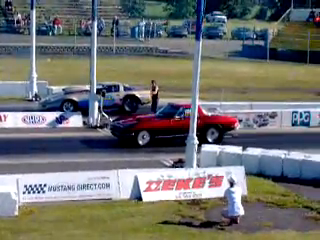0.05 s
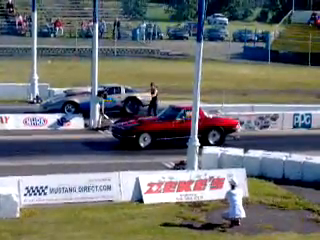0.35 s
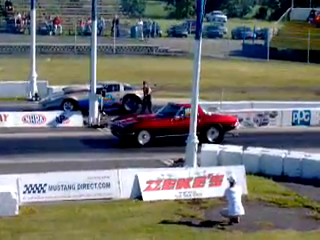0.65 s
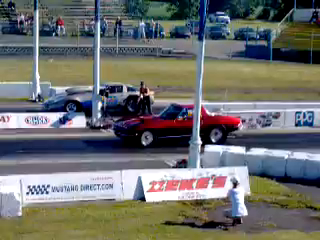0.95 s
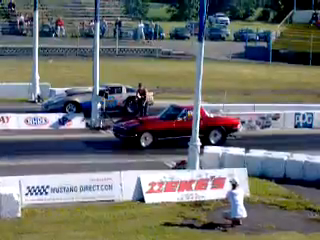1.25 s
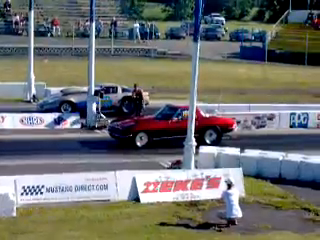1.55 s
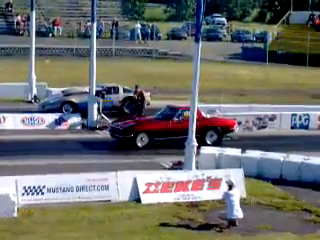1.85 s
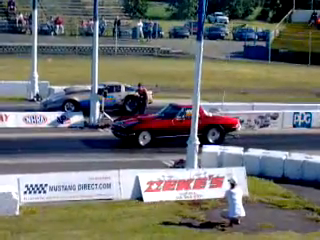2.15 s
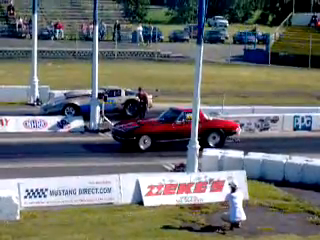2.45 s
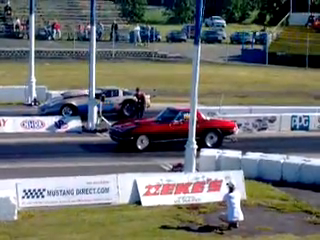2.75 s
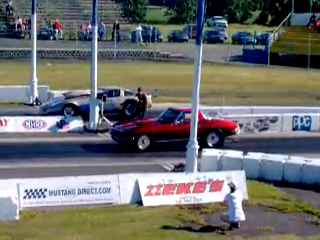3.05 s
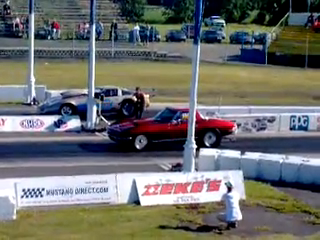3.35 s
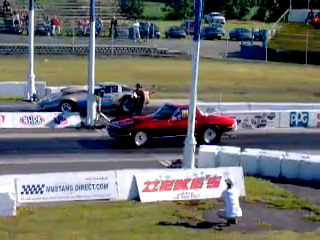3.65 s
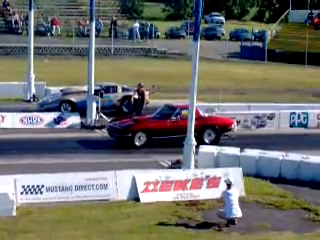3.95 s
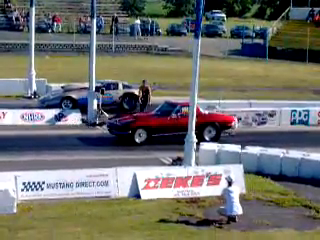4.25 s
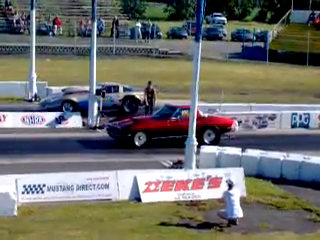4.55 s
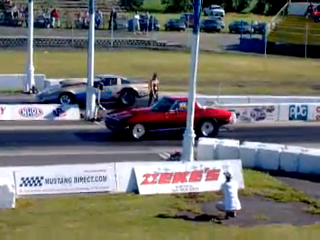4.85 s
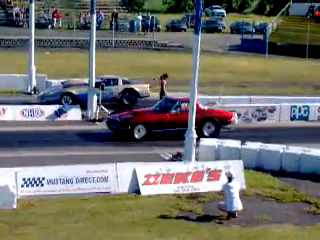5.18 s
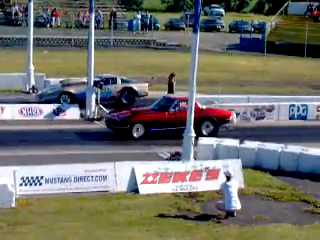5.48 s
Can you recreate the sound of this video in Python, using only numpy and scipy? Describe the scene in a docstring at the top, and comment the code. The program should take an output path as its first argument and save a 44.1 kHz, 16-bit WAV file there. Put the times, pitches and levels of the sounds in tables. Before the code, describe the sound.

A nearby V8 drag car opens at the top of a hard rev, blaring and rasping through open exhaust pipes. Its pitch slides down and its level falls over the first second, with a low pop at about 0.8 seconds. By 1.2 seconds it has settled into a loping idle: ragged, bassy firings with irregular thumps and brief lulls, topped by a gassy rattle, tinny cracks and short metallic rasps. Hollow exhaust pops come around 2.1, 2.5 and 2.9 seconds, with a sharper one near 5 seconds. The thumping is busiest between 2 and 3 seconds. Farther away, a second V8 hums at a fast, even idle, sagging slightly in the middle and stepping up around 4.4 seconds. Both keep running to the end, near 5.7 seconds. The stands add a faint, dull echo, and air rumbles softly on a small mono camera microphone with limited treble.

```python
"""A V8 drag car drops from a hard rev to a loping (uneven) idle at the start line.
Each cylinder firing sends a puff of gas through its open exhaust pipes, which boom, rasp and crackle,
and unburnt fuel pops in them. A second V8 farther off holds a fast, even idle.
The stands echo both cars, and air rumbles on the microphone of a small mono camera."""
import sys
import numpy as np
from scipy import signal
from scipy.fft import rfft, irfft
from scipy.io import wavfile
from scipy.ndimage import uniform_filter1d

SR = 44100
rng = np.random.default_rng(int(sys.argv[2]) if len(sys.argv) > 2 else 0)


def persist_wave(psi):
    """Save psi, clipped to +-1, as 16-bit WAV."""
    counts = np.round(np.clip(psi, -1, 1) * 32767).astype(np.int16)
    wavfile.write(sys.argv[1], SR, np.atleast_2d(counts).T)


N = 252252
T = np.arange(N) / SR
IDLE_FIRING_HZ = 84.94  # near car; one engine cycle is two turns, or eight firings

# Strength of each of the eight firings in dB. The side of the engine that faces away is weaker.
FIRING_DB = [3, -17, -3, 2.5, -12, 3.5, -3.5, -2.5]
# Notes of the rev. Each row: multiple of the cycle rate, peak in dB, pipe resonance in Hz, width in Hz.
REV_NOTES = [(2, -33, 130, 120), (3, -30.5, 108, 240), (6, -31.5, 228, 25), (7, -37, 255, 35),
             (9, -39, 393, 35), (10, -38, 523, 27), (3, -32.5, 77, 15), (8, -30.5, 420, 46),
             (8, -32, 282, 30), (11, -26.5, 627, 16), (11, -36, 529, 50), (12, -38, 684, 50),
             (13, -34.5, 687, 55), (13, -33.5, 557, 90), (14, -33.5, 695, 90), (14, -33, 550, 65),
             (16, -36.5, 765, 70), (16, -37, 545, 70), (17, -38, 690, 50), (18, -37.5, 880, 110),
             (19, -36, 958, 65), (19, -38, 841, 45), (20, -37.5, 1101, 50), (21, -39, 964, 80),
             (22, -35.5, 950, 55), (23, -35.5, 1185, 80), (24, -36.5, 1286, 70), (24, -41, 915, 70),
             (14, -36.5, 790, 40), (17, -35, 840, 34), (21, -36, 1185, 47), (17, -40.5, 680, 47),
             (28, -39, 1000, 70), (29, -44, 990, 60)]
# Resonances of the near car's pipes. Each row: pitch in Hz, width in Hz, gain in dB.
BOOM_RESONANCES = [(88, 87, 18.5), (135, 90, -10.5), (216, 120, -2), (262, 16, 3)]
BARK_RESONANCES = [(283, 19, -1), (423, 36, -5.5), (526, 81, 0.5), (552, 29, 1), (677, 38, -1.5),
                   (778, 110, -5.5), (886, 140, -11), (972, 93, -1), (1090, 60, -14.5), (1150, 52, -3.5),
                   (1310, 54, -6.5)]
# Cylinders catch hard. Each row: time in seconds, relative level in dB, half length in seconds.
SURGES = [(1.678, -21.5, 0.0099), (1.79, -30, 0.015), (1.835, -24, .014), (2.073, -19.5, 0.017),
          (2.125, -19.5, 0.0077), (2.21, -21.5, 0.016), (2.37, -19, 0.0077), (2.448, -21, 0.013),
          (2.5, -18, 0.013), (2.605, -22, 0.033), (2.774, -18, 0.013), (2.834, -20, 0.0099),
          (2.872, -18, 0.02), (2.947, -19.5, 0.021), (2.986, -21.5, 0.016), (3.065, -18.5, 0.015),
          (3.246, -21, 0.012), (3.538, -22.5, 0.013), (3.651, -22, 0.02), (3.736, -21, 0.038),
          (3.815, -24.5, 0.01), (3.953, -24, 0.041), (4.14, -24.5, 0.019), (4.221, -20.5, 0.039),
          (4.302, -22, 0.018), (4.512, -26, 0.0095), (4.665, -25.5, 0.029), (4.868, -26.5, .018),
          (5.128, -23.5, 0.024), (5.169, -22.5, 0.014), (5.212, -22, 0.021), (5.305, -27, 0.012),
          (5.606, -25, 0.036), (5.653, -27, 0.018), (5.71, -19.5, 0.0071)]
# Cylinders miss. Each row: time in seconds, half length in seconds.
LULLS = [(1.27, 0.032), (1.448, 0.017), (1.605, 0.063), (2.27, 0.015), (2.555, 0.01), (2.72, 0.021),
         (2.91, .012), (3.03, .012), (3.172, 0.031), (3.305, 0.039), (3.582, 0.025), (3.91, 0.027),
         (4.095, 0.017), (4.177, 0.014), (4.765, 0.026), (5.037, 0.044), (5.53, .04)]
# Exhaust pops. Each row: start in seconds, spike in dB, ring in dB, ring pitch in Hz, puff in dB,
# the puff's decay in seconds.
POPS = [(0.8, -34, -23, 170, -33, .04), (2.046, -46, -36, 850, -45, .055),
        (2.078, -36, -34, 430, -43, .035), (2.489, -30, -36, 774, -37, .0041),
        (2.0635, -26, -26, 520, -40, .02), (2.859, -27, -26, 420, -42, .017),
        (2.956, -30, -26.5, 375, -42.5, .018), (5.0545, -20, -27, 400, -41, .011)]
# Sharp cracks in the pipes. Each row: start in seconds, relative level in dB, ring pitch in Hz.
CRACKS = [(1.474, -45, 2030), (1.7814, -45, 2350), (1.998, -36.5, 2870), (2.0324, -38, 2660),
          (2.0792, -35, 3400), (2.2164, -43, 1910), (2.44, -40, 2670), (2.4598, -39, 2280),
          (2.4876, -34, 3006), (2.5711, -36.5, 2210), (2.6614, -45, 1810), (2.787, -37.5, 3250),
          (2.9283, -37, 2220), (3.0066, -36.5, 2320), (3.0622, -36, 1680), (3.106, -41, 3000),
          (3.1971, -35, 2330), (3.2824, -34.5, 2400), (3.3497, -36.5, 1701), (3.478, -35.5, 3350),
          (3.5508, -41.5, 1600), (4.0226, -38.5, 3850), (4.151, -36.5, 2600), (4.686, -36, 1752),
          (4.7351, -34, 3360), (4.8609, -39.5, 1720), (4.894, -34, 4390), (4.9066, -39.5, 2300),
          (4.9669, -33.5, 3240), (5.1643, -38, 1689), (5.1931, -33, 4050), (5.206, -33, 3460),
          (5.237, -36, 3930), (5.3692, -40, 2310), (5.3951, -39, 2380), (5.5807, -38, 2950),
          (5.695, -36.5, 1700)]
# Brief rasps. Each row: time in seconds, level in dB, centre in Hz, ratio of top edge to centre,
# half length in seconds.
RASPS = [(2.075, -48, 2380, 1.87, 0.068), (2.528, -52, 2420, 1.36, 0.03), (3.217, -45, 2870, 1.6, 0.017),
         (4.353, -51.5, 1770, 1.12, 0.059), (4.517, -49.5, 2800, 1.9, 0.041),
         (5.222, -58, 2830, 1.59, 0.027)]
# The far idle sags, then steps up. Each row: time in seconds, engine cycles per second.
FAR_SPEED = [(1.2, 25.8), (1.9, 25.62), (2.68, 25.25), (3.1, 25.41), (3.8, 25.62), (4.25, 25.81),
             (4.48, 26.6), (5.25, 26.61), (5.72, 26.28)]
# The far car's weaker notes. Each row: multiple of the cycle rate, level in dB at its slow idle,
# change in dB for each extra cycle per second.
FAR_NOTES = [(5.017, -46, -11), (8.23, -42.5, -3.5), (10.11, -45, -1.5), (20.26, -57.5, 1.5),
             (23.17, -56.5, -1.5), (25.2, -59, 6), (33.74, -64, 6.5)]
# How parts of the engine sound rise and fall. Each row: time in seconds, relative level in dB.
BLARE_LEVEL = [(0, -23.5), (.1, -27), (.18, -19), (.232, -23.5), (.256, -32.5), (.4, -52.5)]
BITE_LEVEL = [(0, -57), (.15, -31.5), (.35, -33.5), (.55, -26.5), (.65, -29.5), (.8, -38.5), (1.1, -67)]
IDLE_GAS_LEVEL = [(1.1, -46.5), (1.25, -51), (1.6, -57.5), (1.8, -56), (2.35, -54), (2.5, -50),
                  (2.9, -52.5), (3.85, -55), (4.1, -54), (4.45, -50.5), (5.25, -51.5), (5.72, -52.5)]
FAR_DRONE_LEVEL = [(0.6, -47), (1.15, -36.5), (1.3, -43), (1.46, -37), (2.3, -43.5), (3.35, -52),
                   (4.25, -39), (4.47, -34), (4.95, -35.5), (5.24, -34.5), (5.72, -38)]
FAR_BARK_LEVEL = [(1.2, -52.5), (1.8, -50), (2.82, -49), (3.25, -55), (3.7, -51.5), (4.3, -48.5),
                  (5.72, -50)]
# Tone colours, from bass to treble. Each row: frequency in Hz, gain in dB.
REV_GAS_COLOUR = [(710, -46), (1200, -2.5), (1600, -7.5), (1730, -1), (2040, -7), (2260, -2), (2500, -7.5),
                  (2840, -5), (3820, -4.5), (5000, -6.5), (6500, -29), (11000, -120)]
IDLE_GAS_COLOUR = [(590, -28.5), (1000, -1), (1080, -0.5), (1440, -7.5), (1690, -1.5), (2100, -8.5),
                   (2350, -4.5), (3060, -7), (3340, -5), (5000, -9.5), (6500, -53.5), (11000, -120)]
IDLE_PIPE_COLOUR = [(25, -25), (50, -13), (70, 12.5), (85, 3.5), (110, 1.5), (160, -17.5), (260, -6),
                    (340, -32.5), (600, -20), (1200, -50.5)]
FAR_BARK_COLOUR = [(180, -33.5), (300, -11.5), (361, -4.5), (394, -14.5), (524, 3), (591, 0.5), (627, -2),
                   (676, 1.5), (786, 3.5), (842, -10), (914, 1), (1070, -19.5), (1200, -13.5), (1560, -39),
                   (2640, -120)]
AIR_COLOUR = [(12, -6.5), (25, -8.5), (50, 4), (120, -1.5), (280, -10.5), (360, -21.5), (1000, -25.5),
              (5000, -38.5)]
CAMERA_COLOUR = [(20, -2), (4200, 0), (4900, -0.5), (5250, -4.5), (5500, -9), (5900, -35.5), (7000, -76.5)]


def near_rev():
    """The near engine coasts down, and its notes swell as they slide through the pipes' resonances."""
    top_cycle_hz, throttle_shut_s, coast_s = 57.34, 0.095, 1.095
    coasted_s = T - throttle_shut_s * (1 - np.exp(-T / throttle_shut_s))
    cycle_hz = np.maximum(top_cycle_hz * np.exp(-coasted_s / coast_s), IDLE_FIRING_HZ / 8)
    # each side of the engine fires unevenly, which brings out every multiple of the cycle rate
    turns = rng.random(size=32)
    notes = sum(tone(k * cycle_hz, db, waver_db=2.4, waver_hz=24.8, turn=turns[round(k)])
                * undb(swell(k * cycle_hz, hz, width)) for k, db, hz, width in REV_NOTES)
    pulses = firings(cycle_hz, jitter_s=0.000092, scatter_db=5.5)
    boom = band(ring(puffs(pulses, decay_s=0.0019, steady=1.1), BOOM_RESONANCES), 55, 314)
    bark = band(ring(puffs(pulses, decay_s=0.0066, steady=0.9), BARK_RESONANCES), 380, 1600)
    # hot gas tears out of the open pipes, with a biting resonance in the treble
    gas = colour(puffs(pulses, decay_s=0.0017, steady=1.5), REV_GAS_COLOUR)
    bite = band(puffs(pulses, decay_s=0.0023, steady=2.4), 2650, 4440)
    roar = (even(boom) * fade(-31.5, hold_s=0.54, db_per_s=12.5)
            + even(bark) * fade(-32.5, hold_s=0.48, db_per_s=15.7)
            + even(gas) * fade(-28.5, hold_s=0.68, db_per_s=42)
            + even(bite) * undb(curve(BITE_LEVEL)))
    return notes + blare(cycle_hz) + growl(cycle_hz) + roar


def blare(cycle_hz):
    """The rev's loudest note spits gas at each wave crest and collapses once the throttle is shut."""
    wave = tone(5 * cycle_hz, 0, waver_db=0.8, waver_hz=110)
    crest = np.maximum(wave, 0) ** 3
    spit = unit(crest * band(noise(), 340, 4300))
    buzz = unit(band(crest, 440, 1500))
    return (wave + undb(-21) * buzz + undb(-13.5) * spit) * undb(curve(BLARE_LEVEL))


def growl(cycle_hz):
    """Many weak engine notes slide down together."""
    notes = sum(tone(k * cycle_hz, 0, waver_db=2.5, waver_hz=9, turn=rng.random()) for k in range(6, 27))
    return notes * fade(-44, hold_s=0.55, db_per_s=22)


def near_idle():
    """Intake and exhaust valves stay open together, so the idle lopes: ragged firings between surges."""
    firing_hz = IDLE_FIRING_HZ * (1 + 0.012 * walk(6))
    pulses = firings(firing_hz / 8, jitter_s=0.0015, scatter_db=3)
    # a surge builds faster than it dies
    surge = sum(undb(db) * bump(s, half_s * np.where(T < s, 0.89, 1.04)) for s, db, half_s in SURGES)
    lull = sum(bump(s, half_s) for s, half_s in LULLS)
    ragged = even(colour(firings(firing_hz / 8, jitter_s=0.0015, scatter_db=4), IDLE_PIPE_COLOUR))
    # in a surge the raggedness gives way to a thump: the pipe swings in step with the firings
    ragged = ragged / (1 + surge / undb(-20))
    phase = 2 * np.pi * np.cumsum(firing_hz) / SR + 0.5 * walk(22)
    thump = surge * (np.sin(phase) + undb(-18) * np.sin(2 * phase) + undb(-22) * np.sin(3 * phase))
    # in a lull the pipe's lowest resonance goes quieter
    bass = signal.sosfiltfilt(signal.butter(3, 140, fs=SR, output="sos"), ragged)
    ragged = ragged + (undb(-6.5 * lull) - 1) * bass
    gas = colour(puffs(pulses, decay_s=0.0048, steady=1.1) * undb(2.3 * walk(35)), IDLE_GAS_COLOUR)
    rasp = undb(-1.5) * even(gas) + undb(-5) * crackle()
    return undb(-33) * ragged + undb(-2) * thump + rasp * undb(curve(IDLE_GAS_LEVEL))


def pops():
    """Unburnt fuel goes off in the pipes: a pressure spike, a hollow ring and a puff of gas."""
    out = 0
    for s, spike_db, ring_db, hz, puff_db, decay_s in POPS:
        spike = np.exp(-np.abs(T - s) / 0.0008)
        hollow = burst(s, decay_s=0.0033) * np.sin(2 * np.pi * hz * (T - s))
        puff = burst(s, decay_s) * unit(band(noise(), hz / 1.7, hz * 1.6))
        out += undb(spike_db) * spike + undb(ring_db) * hollow + undb(puff_db) * puff
    return out


def cracks():
    """Each crack is a bright spit of gas, blurred by distance, and a short tinny ring."""
    bursts = sum(undb(db) * burst(s, decay_s=0.005) for s, db, _ in CRACKS)
    spit = uniform_filter1d(bursts, size=110) * unit(band(noise(), 1700, 5200))
    tinny = sum(undb(db) * burst(s, decay_s=0.007) * hiss(hz, ratio=1.12) for s, db, hz in CRACKS)
    return undb(-6) * spit + undb(-11) * tinny


def crackle():
    """Hundreds of small cracks of uneven strength blend into a rattle."""
    out = 0
    for hz in (1910, 2540, 3350, 4300):
        when, strength = rng.random((600, 2)).T
        hits = np.bincount((when * N).astype(int), undb(12 * strength), N)
        out += unit(band(puffs(hits, decay_s=0.005, steady=0), hz / 1.3, hz * 1.3))
    return unit(out)


def rasps():
    """Short swells of metallic rasp over the idle."""
    return sum(undb(db) * bump(s, half_s) * hiss(hz, ratio) for s, db, hz, ratio, half_s in RASPS)


def far_car():
    """A fast idle: a hum that follows the engine speed, and a rough bark from the pipes."""
    cycle_hz, slow_idle_hz = curve(FAR_SPEED), 25.68
    drone = tone(7 * cycle_hz, curve(FAR_DRONE_LEVEL), waver_db=1.8, waver_hz=16)
    notes = sum(tone(k * cycle_hz, db + slope * (cycle_hz - slow_idle_hz), waver_db=1.5, waver_hz=8.3)
                for k, db, slope in FAR_NOTES)
    pulses = firings(cycle_hz, jitter_s=0.00014, scatter_db=4.5)
    clatter = even(band(pulses, 300, 1300))
    gas = even(band(puffs(pulses, decay_s=0.0068, steady=0.65), 290, 1300))
    bark = even(colour(clatter + 0.63 * gas, FAR_BARK_COLOUR)) * undb(curve(FAR_BARK_LEVEL))
    return drone + notes, bark


def stands_echo(x, die_away_s, gap_s):
    """The stands and walls scatter the sound back, dull and late."""
    tail = band(noise(), 300, 3500) * burst(gap_s, die_away_s / np.log(1000))
    return signal.fftconvolve(x, tail / np.sqrt(np.sum(tail ** 2)))[:N]


def air_rumble():
    """Moving air rumbles on the microphone."""
    return unit(colour(noise(), AIR_COLOUR)) * undb(-37 + 2.75 * walk(9))


def firings(cycle_hz, jitter_s, scatter_db):
    """One pressure pulse per cylinder firing, each a little off in time and strength."""
    count = np.cumsum(8 * cycle_hz) / SR
    k = np.arange(int(count[-1]))
    late, strong = rng.standard_normal((len(k), 2)).T
    times = np.interp(k, count, T) + jitter_s * late
    sizes = undb(np.take(FIRING_DB, k, mode="wrap") + scatter_db * strong)
    return np.bincount(np.clip(times * SR, 0, N - 1).astype(int), sizes, N)


def puffs(pulses, decay_s, steady):
    """Swirling gas: a burst of noise behind each pulse, over a steady flow."""
    flow = signal.lfilter([1], [1, -np.exp(-1 / (decay_s * SR))], pulses)
    return (even(flow) + steady) * noise()


def tone(hz, level_db, waver_db, waver_hz, turn=0):
    """An engine note that wavers a little in timing and strength."""
    phase = 2 * np.pi * (turn + np.cumsum(hz) / SR) + 0.02 * waver_db * walk(waver_hz)
    return unit(np.sin(phase) * undb(waver_db * walk(waver_hz))) * undb(level_db)


def ring(x, resonances):
    """A pipe rings at several pitches at once."""
    return sum(undb(db) * signal.lfilter(*signal.iirpeak(hz, hz / width, SR), x)
               for hz, width, db in resonances)


def swell(hz, centre_hz, width_hz):
    """Gain in dB of a note that passes through a resonance."""
    return -20 * np.log10(1 + (2 * (hz - centre_hz) / width_hz) ** 2)


def colour(x, points, size=8192):
    """Shape the bass and treble to follow a tone colour table."""
    hz, db = np.transpose(points)
    grid = np.maximum(np.fft.rfftfreq(size, 1 / SR), 1)
    cepstrum = irfft(np.log(undb(np.interp(np.log(grid), np.log(hz), db))))
    # make the filter ring only after a sound, never before it
    cepstrum[1:size // 2] *= 2
    cepstrum[size // 2 + 1:] = 0
    return signal.fftconvolve(x, irfft(np.exp(rfft(cepstrum))))[:N]


def band(x, lo_hz, hi_hz):
    """Keep what lies between two frequencies."""
    return signal.sosfilt(signal.butter(3, [lo_hz, hi_hz], "band", fs=SR, output="sos"), x)


def noise():
    """White noise."""
    return rng.standard_normal(N)


def hiss(hz, ratio):
    """Noise around one pitch; a bigger ratio makes it wider."""
    return unit(band(noise(), hz / ratio, hz * ratio))


def walk(rate_hz):
    """A random wander, about 1 either way."""
    points = rng.standard_normal(2048)
    return 1.2 * np.interp(T * rate_hz, np.arange(len(points)), points)


def burst(start_s, decay_s):
    """A sudden start that dies away."""
    return (T >= start_s) * np.exp(-np.abs(T - start_s) / decay_s)


def bump(peak_s, half_s):
    """A smooth rise and fall."""
    return np.exp(-((T - peak_s) / half_s) ** 2)


def fade(db, hold_s, db_per_s):
    """A gain that holds, then dies away."""
    return undb(db - db_per_s * np.maximum(T - hold_s, 0))


def curve(table):
    """Join a table's points with straight lines in time."""
    return np.interp(T, *np.transpose(table))


def even(x, size=4400):
    """Hold the level near 1 over tenths of a second; faster detail stays."""
    power = uniform_filter1d(uniform_filter1d(x ** 2, size), size // 2)
    return x / np.sqrt(np.abs(power) + 1e-18)


def unit(x):
    """Scale to an average (rms) level of 1."""
    return x / np.sqrt(np.mean(x ** 2))


def undb(db):
    """Decibels to gain."""
    return 10 ** (np.asarray(db) / 20)


def scene():
    """Both cars, their echo and the moving air, in mono."""
    settled = np.clip((T - 1.03) / 0.19, 0, 1)  # 0 during the rev, 1 at idle
    near = (1 - settled) * near_rev() + settled * near_idle() + pops() + cracks() + rasps()
    far_hum, far_bark = far_car()
    echo = undb(-15) * stands_echo(near + 2.32 * far_bark, die_away_s=0.74, gap_s=0.04)
    return np.tile(near + far_hum + far_bark + echo + air_rumble(), (2, 1))


def record(dry):
    """The camera keeps every fourth sample and holds it, which adds a mirror image of the treble."""
    hold, top_hz = 4, 6930
    held = np.repeat(colour(dry[0], CAMERA_COLOUR)[::hold], hold)[:N]
    treble_cut = signal.ellip(14, 0.2, 80, top_hz, fs=SR, output="sos")
    return np.tile(signal.sosfilt(treble_cut, held), (2, 1))


dry = scene()
out = record(dry)
persist_wave(out)
```